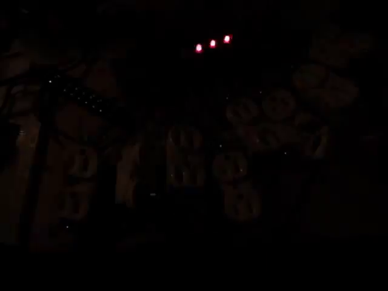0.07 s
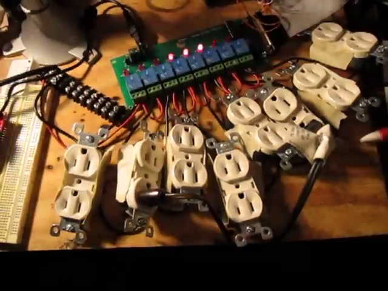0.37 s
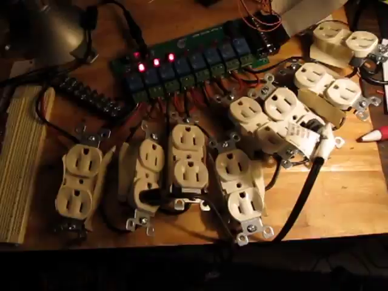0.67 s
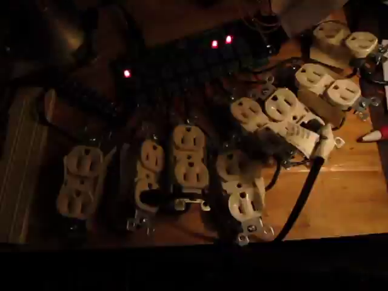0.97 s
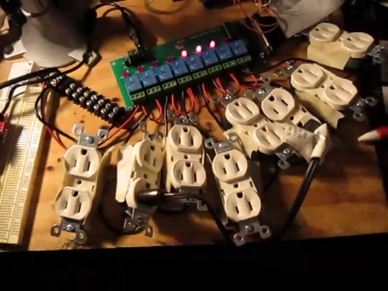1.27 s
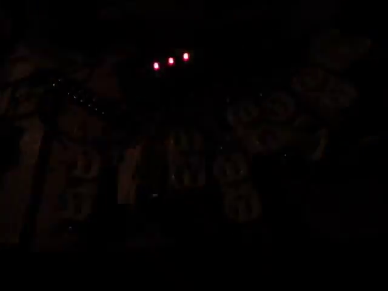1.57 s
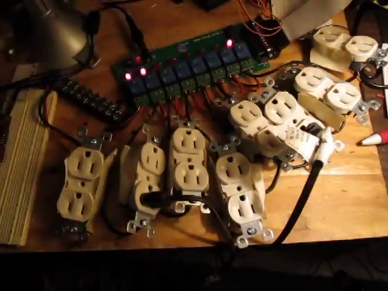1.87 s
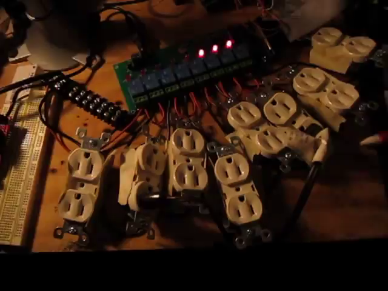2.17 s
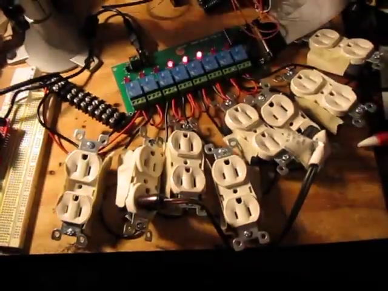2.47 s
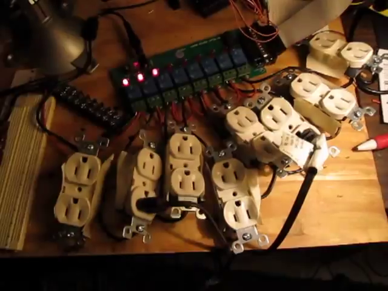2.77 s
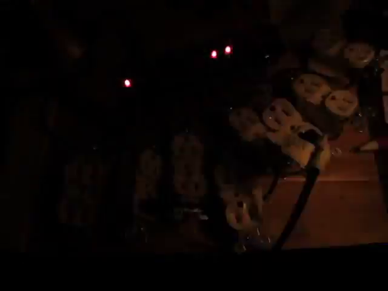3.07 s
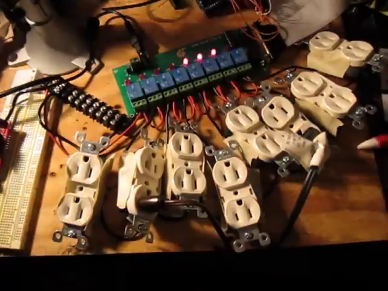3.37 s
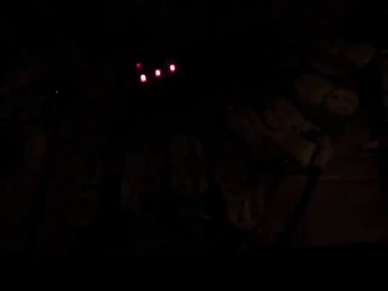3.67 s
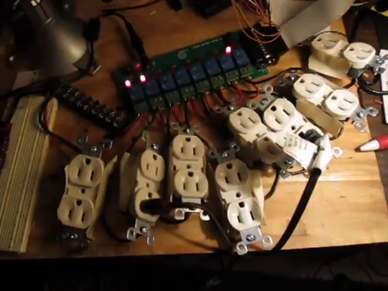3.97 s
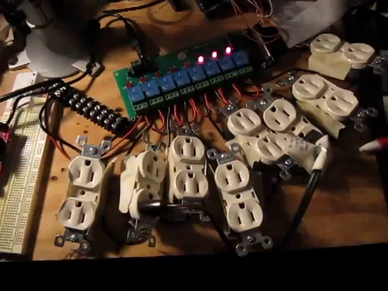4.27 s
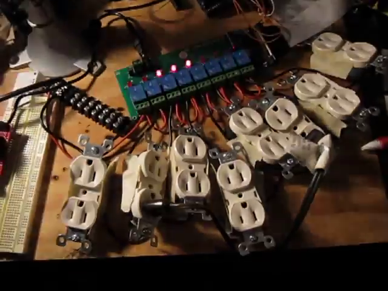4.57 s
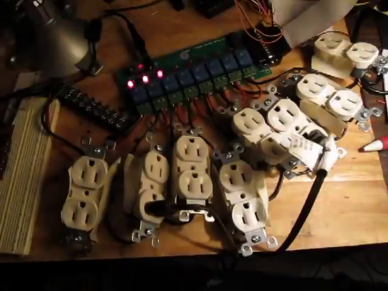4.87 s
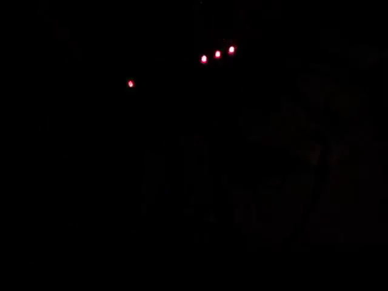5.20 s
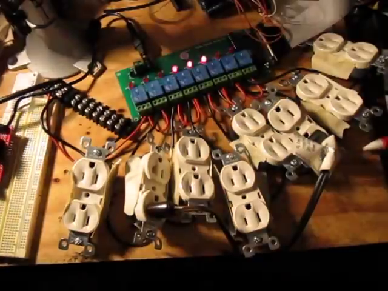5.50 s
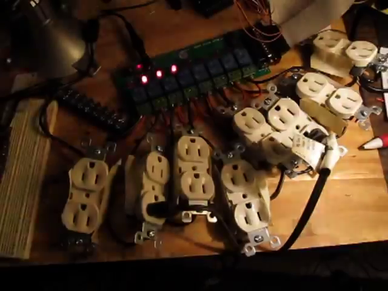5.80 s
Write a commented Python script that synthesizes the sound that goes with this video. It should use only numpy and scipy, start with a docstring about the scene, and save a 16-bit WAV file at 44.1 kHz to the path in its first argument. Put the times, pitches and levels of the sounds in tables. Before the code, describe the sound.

Crisp, bright clicks run evenly from start to finish as a row of small relays cycles through an eight-step pattern, roughly once each second. Some clicks are thin ticks, others carry a slight woody knock from the board on the bench. They are heard close up, a little louder at first, with a very short room echo over soft air and a low hum.

```python
"""Eight small relays on a circuit board, close to the microphone, chased by a timer through a repeating
eight-step pattern. At each step several armatures slap shut or spring back within milliseconds; the
cases ring, the return springs sing faintly and the board knocks on a wooden bench. Behind them a small,
quiet room answers briefly, over soft air and faint wavering tones: a low hum and a room resonance."""
import sys
import numpy as np
from scipy import signal
from scipy.fft import rfft, irfft
from scipy.io import wavfile
from scipy.ndimage import uniform_filter1d

SR = 44100
rng = np.random.default_rng(int(sys.argv[2]) if len(sys.argv) > 2 else 0)


def unload_audio(sound):
    """Save the sound as a 16-bit wav file, at the path given as the first command line argument."""
    columns = np.transpose(np.atleast_2d(sound))
    # keep every value between -1 and 1, then stretch to whole-number steps
    steps = np.round(np.clip(columns, -1, 1) * 32767)
    wavfile.write(sys.argv[1], SR, steps.astype(np.int16))


N = 261954
CYCLE_S = 1.03205
CLICK_SAMPLES = 4096
CLICK_T = np.arange(CLICK_SAMPLES) / SR

# Room tone. Each row: frequency in Hz, spectral level in dB.
AIR_SPECTRUM = [(3, -50.5), (9, -5.5), (25, -21), (45, -29), (90, -37), (140, -38), (210, -43), (300, -37),
                (380, -43.5), (700, -47.5), (1800, -53), (4500, -63.5), (9000, -69), (13000, -75.5),
                (16000, -87)]
# Faint background tones, a low hum and a room resonance. Each row: frequency in Hz, level in dB.
BACKGROUND_TONES = [(61, -58.5), (176, -66.5), (268, -68.5), (292.5, -63.5), (3200, -77)]
# The board on the bench. Each row: mode frequency in Hz, level in dB, 60 dB decay time in seconds.
BOARD_MODES = [(382, 13.5, 0.058), (515, 17.5, 0.054), (609.6, 16, 0.054), (781, 16, 0.065),
               (899, 13.5, 0.044), (1100, 14.5, 0.022)]
# How the long, narrow board bends in each mode. Each row: half waves along, half waves across.
BOARD_BENDS = [(3, 1), (1, 2), (4, 1), (2, 2), (3, 2), (5, 1)]
# The relay cases. Each row: mode frequency in Hz, level in dB, 60 dB decay time in seconds.
CASE_MODES = [(2407, 12, 0.034), (3522, 9.5, 0.05), (4732, 16, 0.046), (6610, -3.5, .03),
              (10150, 13.5, 0.022)]
# The return springs, a cluster of close modes for each step.
# Each row: centre in Hz, width in Hz, level in dB, 60 dB decay time in seconds.
SPRING_CLUSTERS = [(5260, 410, -23.5, 0.2), (6000, 1300, -20.5, 0.17), (7550, 1400, -15.5, 0.15),
                   (9140, 640, -26, 0.24), (8200, 640, -35, 0.51), (4280, 1100, -23, 0.11),
                   (7100, 1200, -22.5, 0.14), (3665, 810, -14.5, 0.13)]
# What the relays throw off-mic, into the room. Each row: frequency in Hz, level in dB.
OFF_MIC_COLOUR = [(300, 5), (500, 9), (900, 8), (1500, -10), (2500, 1), (3600, 6), (5000, -1.5),
                  (8500, 2.5), (11000, -3), (13000, -12.5), (16500, -19)]
# Each step works other relays, so has its own colour on-mic. Each row: frequency in Hz, level in dB.
COLOUR_1 = [(1510, -25), (2390, 7.5), (3970, -5), (5120, 11.5), (5660, 0), (6940, 11.5), (7690, -0.5),
            (8960, 9), (9430, -11), (9920, 13.5), (10430, 4), (10980, -6.5), (16490, -17)]
COLOUR_2 = [(1510, -13), (1950, -15), (2390, 3.5), (2780, -6), (4180, -1), (4630, 10), (5120, 4.5),
            (6280, 10), (9430, -3), (10430, 0.5), (10980, -6.5), (11550, -1), (16490, -18.5)]
COLOUR_3 = [(1510, -21), (2060, -9.5), (2460, 9), (2800, -4.5), (3560, 7.5), (3800, -5.5), (4390, 13),
            (4800, 13.5), (5660, 6), (8100, 7.5), (10100, 1.5), (11200, -6.5), (16490, -12)]
COLOUR_4 = [(1510, -18), (2060, 2), (2460, 14), (2850, -7.5), (3410, 11), (3970, -2.5), (4300, 11.5),
            (6940, 10), (7690, 4), (8600, 15.5), (10400, 6), (12160, 2.5), (16490, -14.5)]
COLOUR_5 = [(1510, -12), (2060, 0), (2510, 4.5), (2650, 0), (2780, -5), (3080, 10.5), (3970, 14.5),
            (4870, 22.5), (5660, 9), (7310, 3.5), (8520, 17.5), (12790, -5), (16490, -6.5)]
COLOUR_6 = [(1510, -4), (1680, -15.5), (2930, -10.5), (3590, 16), (3780, -3), (4390, 19.5), (4870, 17.5),
            (5380, 5.5), (5960, 15), (6600, -3.5), (7690, 7), (11550, -9), (16490, -11.5)]
COLOUR_7 = [(1510, -7.5), (1950, -6.5), (2390, 12), (2650, 2), (2930, 12), (3240, -7), (4390, 10),
            (5380, 5), (6600, 15.5), (7690, 15.5), (8100, 3), (9430, 10), (16490, -15)]
COLOUR_8 = [(1510, -13.5), (2390, 9.5), (2650, 3), (3590, 13), (3780, 4.5), (4870, 19), (5660, 4),
            (8100, 12.5), (8520, 13.5), (9430, 7), (10430, 9), (10980, -2.5), (16490, -6.5)]
# Those eight colours in step order.
ON_MIC_COLOURS = [COLOUR_1, COLOUR_2, COLOUR_3, COLOUR_4, COLOUR_5, COLOUR_6, COLOUR_7, COLOUR_8]
# Armature and contact strikes, a list for each step.
# Each row: delay after the step in ms, level in dB, ring frequency in Hz, ring time constant in ms.
STRIKES = [
    [(.9, -19, 4870, 0.57), (4.3, -2.5, 7360, 0.044), (4.9, -10.5, 4640, 0.32)],
    [(3.4, -14, 5000, .2), (4.0, 0, 6200, .1), (5.4, -7, 6300, .2), (8.5, -12, 6000, .2),
     (10.9, -6, 5400, .25)],
    [(2.6, -11, 4800, .3), (3.7, 0, 7000, .12), (5.4, -1, 4750, .25)],
    [(.2, -21.5, 4700, 0.11), (1.9, -14, 7400, 0.25), (4.3, -2, 6134, 0.16), (4.8, 2, 9010, 0.15)],
    [(1.9, 0, 4650, .35), (4.4, -3, 8600, .3), (4.9, -2, 4700, .35)],
    [(1.8, 0, 4700, .35), (4.3, 0, 4700, .4), (6.8, -12, 4400, .3)],
    [(4.25, 0, 7100, .11), (7.6, -14, 4700, .15)],
    [(4.2, -4.5, 5400, 0.14), (4.9, -0.5, 8900, 0.49), (7.7, -22, 5140, 0.134)],
]
# The steps of one cycle. Each row: start in seconds, click gain in dB, case gain in dB, room send in dB,
# board delay in ms, scatter gain in dB, knock gain in dB, place of the push along and across (0 to 1).
STEPS = [(.0817, 1.5, -4.5, 1.5, 0.73, 1.5, 11, 0.48, .05), (.209, 2.5, -4, 1, 4, 6, -4, .19, 0.49),
         (.3405, 2, -1, 2.5, 3.5, 12.5, -0.5, .22, 0.46), (.4683, -1.5, -17, 3, 1.4, -3.5, -0.8, .40, 0.47),
         (.5964, -5, -14.5, 3, 4.9, 7.5, -1.3, 0.36, .03), (.7259, -1, -15, 2, 2.86, -1.5, 8.5, 0.4, 0.05),
         (.8535, 1, -2, 2, 3.58, -7, -7, 0.28, .41), (.9828, -1.5, -21, 2, 3.5, -1.5, -3.5, 0.32, .44)]


def undb(db):
    """Decibels to gain."""
    return 10 ** (np.asarray(db) / 20)


def unit(x):
    """Scale to unit energy."""
    return x / np.sqrt(np.sum(x ** 2))


def add(out, x, start_s):
    """Mix x into out at start_s."""
    i = max(int(round(start_s * SR)), 0)
    part = x[:max(len(out) - i, 0)]
    out[i:i + len(part)] += part


def fade(t, t60):
    """Exponential decay, 60 dB down after t60 seconds."""
    return np.exp(-np.log(1000) * t / t60)


def wander(rate_hz):
    """A slow random drift with a spread near 1."""
    hold = int(SR / rate_hz)
    stairs = np.repeat(rng.standard_normal(N // hold + 1), hold)
    return 1.45 * uniform_filter1d(uniform_filter1d(stairs, hold), hold)[:N]


def band(x, hz, width_hz):
    """One resonance, gain 1 at its centre."""
    return signal.lfilter(*signal.iirpeak(hz, hz / width_hz, fs=SR), x)


def bin_gains(colour, size):
    """Rows of Hz and dB as a gain for each frequency bin."""
    hz, db = np.transpose(colour)
    bin_hz = np.arange(size // 2 + 1) * SR / size
    return undb(np.interp(np.log(bin_hz + 1), np.log(hz), db))


def recolour(x, colour):
    """Causal filter that gives x the broad spectrum of colour and keeps its fine structure."""
    spectrum = rfft(x)
    broad = np.sqrt(uniform_filter1d(np.abs(spectrum) ** 2, size=45) + 1e-9)
    cepstrum = irfft(np.log(bin_gains(colour, CLICK_SAMPLES) / broad))
    cepstrum[1:CLICK_SAMPLES // 2] *= 2  # fold to minimum phase
    cepstrum[CLICK_SAMPLES // 2 + 1:] = 0
    return irfft(spectrum * np.exp(rfft(cepstrum)))


def ring(modes, drive_db):
    """Damped modes of alternating sign; level plus drive sets the height of each spectral peak."""
    drive = undb(np.zeros(len(modes)) + drive_db)
    ringing = np.zeros(CLICK_SAMPLES)
    for k, (hz, db, t60) in enumerate(modes):
        amplitude = (-1) ** k * drive[k] * undb(db) * 2 * np.log(1000) / (t60 * SR)
        ringing += amplitude * fade(CLICK_T, t60) * np.sin(2 * np.pi * hz * CLICK_T)
    return ringing


def room_air(swell_db=0.56):
    """Soft room tone with a low rumble, swelling slightly."""
    noise = irfft(rfft(rng.standard_normal(N)) * bin_gains(AIR_SPECTRUM, N), N)
    return noise * undb(swell_db * wander(rate_hz=3.855))


def background_tones(waver_db=2, drift_rad=.7):
    """A low hum and a room resonance: faint tones that waver in level and phase."""
    t = np.arange(N) / SR
    tones = np.zeros(N)
    for hz, db in BACKGROUND_TONES:
        amplitude = np.sqrt(2) * undb(db + waver_db * wander(rate_hz=8))
        tones += amplitude * np.sin(2 * np.pi * hz * t + drift_rad * wander(rate_hz=7))
    return tones


def room_tail(x, tail_db, t60=.215, build_s=0.002):
    """A small furnished room: a short diffuse tail that builds up as the first reflections arrive."""
    t = np.arange(SR // 2) / SR
    build = 1 - np.exp(-(t / build_s) ** 2)
    response = unit(rng.standard_normal(len(t)) * fade(t, t60) * build)
    return undb(tail_db) * signal.fftconvolve(x, response)[:N]


def board_knock(along, across, gain_db=2.0, node_db=-21, rise_s=0.0051):
    """A push drives each bending mode as far as it swings at that place; the board takes time to move."""
    swing = np.prod(np.sin(np.pi * np.array(BOARD_BENDS) * [along, across]), axis=1)
    # a relay has some width, so even on a node it drives the mode a little
    drive_db = 10 * np.log10(swing ** 2 + undb(node_db) ** 2)
    return undb(gain_db) * ring(BOARD_MODES, drive_db) * (1 - np.exp(-CLICK_T / rise_s))


def return_springs(hz, width_hz, db, t60, build_s=0.0064):
    """The thin, lingering ring of coil springs shaken by the blow."""
    t = np.arange(SR // 2) / SR
    cluster = band(band(rng.standard_normal(len(t)), hz, width_hz), hz, width_hz)
    build = 1 - np.exp(-(t / build_s) ** 2)
    return undb(db) * unit(cluster * fade(t, t60) * build)


def armature_strike(hz, ring_ms, scatter_db, grain, scatter_t60=0.019, crack_db=-7, crack_t60=0.0027):
    """Metal meets metal: a crack, a brief armature ring, then scatter from the board and parts around."""
    age = CLICK_T * 1e3 / ring_ms
    armature = unit(age * np.exp(-age) * np.sin(2 * np.pi * hz * CLICK_T))
    crack = unit(grain[0] * fade(CLICK_T, crack_t60))
    scatter = unit(grain[1] * fade(CLICK_T, scatter_t60) * (1 - np.exp(-CLICK_T / 0.00045)))
    return armature + undb(crack_db) * crack + undb(scatter_db) * scatter


def relay_click(step, grains, jitter_ms=.06, uneven_db=1.5, fresh_gain=0.71):
    """One step, never twice alike: the sound at the microphone, then its on- and off-mic room sends."""
    _, click_db, case_db, room_db, board_ms, scatter_db, knock_db, along, across = STEPS[step]
    snap, body = np.zeros((2, CLICK_SAMPLES))
    for (ms, db, hz, ring_ms), own_grain in zip(STRIKES[step], grains):
        late, hard = rng.standard_normal(2)
        grain = own_grain + fresh_gain * rng.standard_normal(own_grain.shape)
        hit = armature_strike(hz, ring_ms, scatter_db, grain)
        add(snap, undb(db + uneven_db * hard) * hit, (ms + jitter_ms * late) / 1e3)
    # the heaviest strike sets the cases ringing
    heaviest_ms = max(STRIKES[step], key=lambda row: row[1])[0]
    add(body, ring(CASE_MODES, case_db), heaviest_ms / 1e3)
    add(body, undb(knock_db) * board_knock(along, across), board_ms / 1e3)
    colour = [(900, -22)] + list(ON_MIC_COLOURS[step])  # the snap is weak below 900 Hz
    on_mic = undb(click_db) * recolour(snap, colour) + body
    off_mic = recolour(snap, OFF_MIC_COLOUR)  # over all directions the colours even out
    return on_mic, undb(room_db) * on_mic, undb(room_db) * off_mic


def relays():
    """The pattern repeats, close up; each step keeps its grain because the same parts collide."""
    direct, on_mic_send, off_mic_send, reflection = np.zeros((4, N))
    for step, (first_s, *_) in enumerate(STEPS):
        grains = rng.standard_normal((len(STRIKES[step]), 2, CLICK_SAMPLES))
        springs = return_springs(*SPRING_CLUSTERS[step])
        for start_s in np.arange(first_s, N / SR, CYCLE_S):
            for path, sound in zip((direct, on_mic_send, off_mic_send), relay_click(step, grains)):
                add(path, sound, start_s)
            add(direct, springs, start_s)
    add(reflection, undb(-27.0) * off_mic_send, start_s=.0215)  # off one nearby surface
    tail = room_tail(on_mic_send, tail_db=-27.5) + room_tail(off_mic_send, tail_db=-19.5)
    return direct + reflection + tail


def scene():
    """One microphone at the bench: relays in front, the quiet room behind."""
    return (relays() + room_air() + background_tones())[None]


def record(dry, silence_s=.033, opening_db=6.0, settle_s=0.9, sparkle_db=-6, top_hz=16900):
    """Brief silence, a loud opening that settles; a slight sparkle near 15 kHz brightens the clicks."""
    t = np.arange(N) / SR
    settling = dry * undb(opening_db * np.exp(-t / settle_s)) * (t > silence_s)
    bright = settling + undb(sparkle_db) * band(settling, hz=15000, width_hz=2000)
    lowpass = signal.ellip(8, .2, 70, top_hz, fs=SR, output="sos")
    return signal.sosfilt(lowpass, np.clip(bright, -1, 1))


dry = scene()
out = record(dry)
unload_audio(out)
```